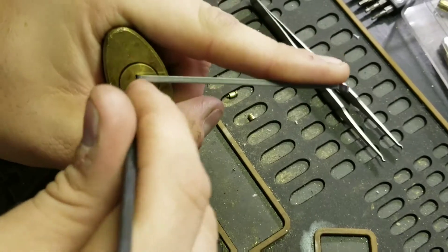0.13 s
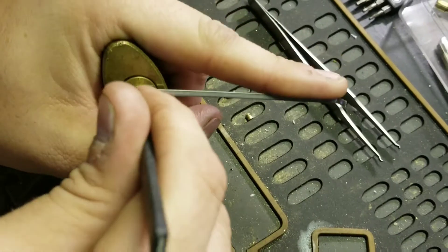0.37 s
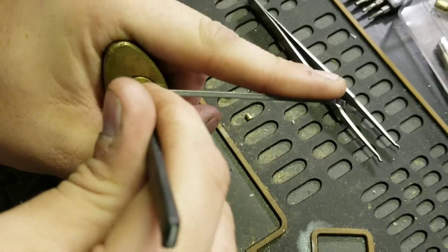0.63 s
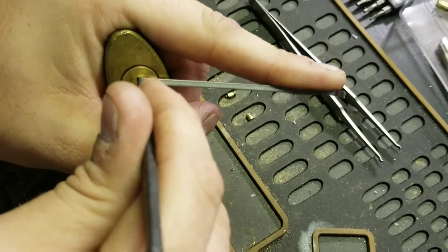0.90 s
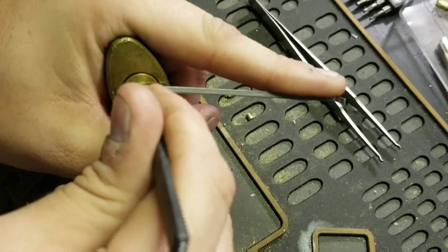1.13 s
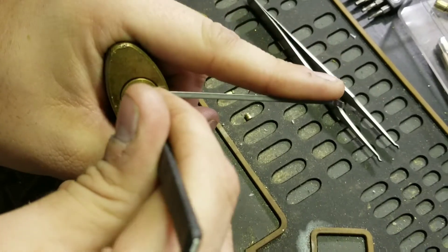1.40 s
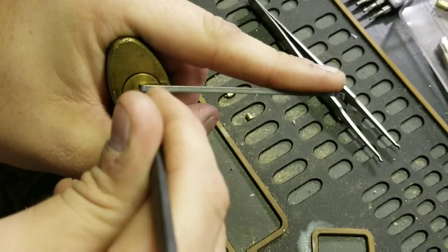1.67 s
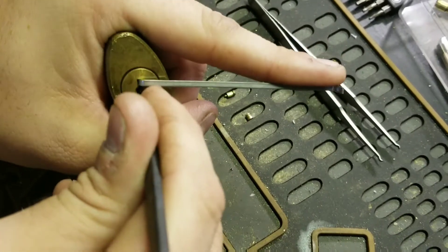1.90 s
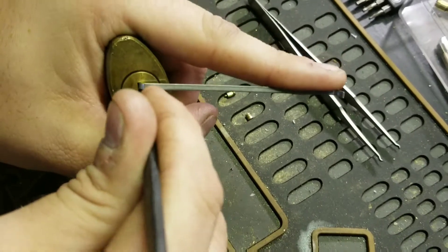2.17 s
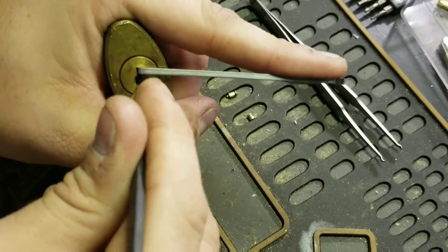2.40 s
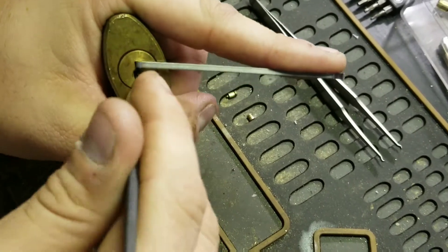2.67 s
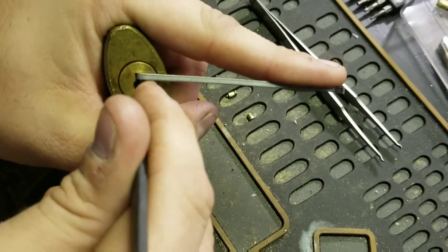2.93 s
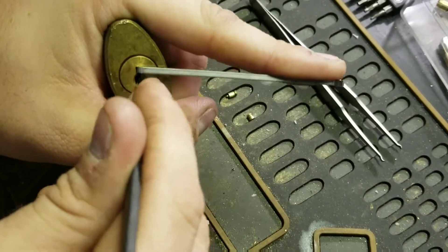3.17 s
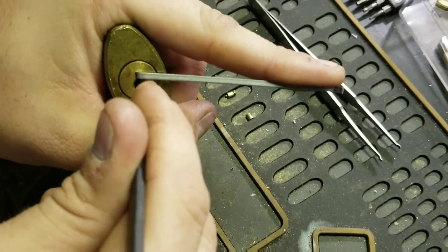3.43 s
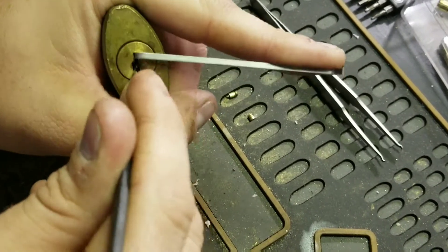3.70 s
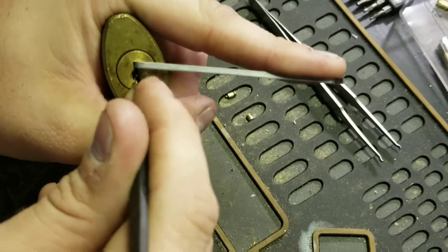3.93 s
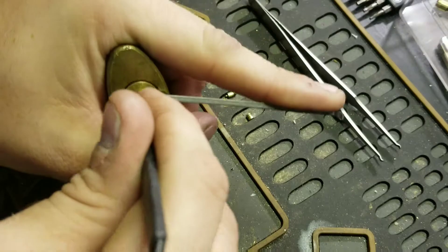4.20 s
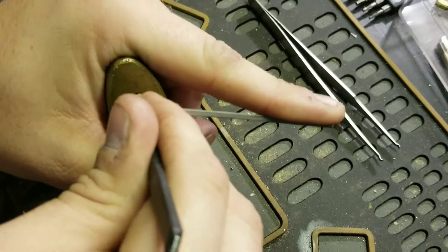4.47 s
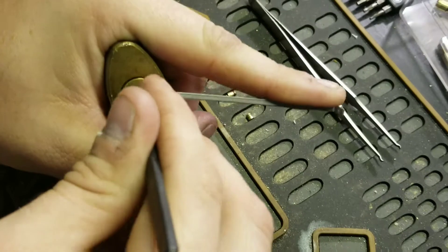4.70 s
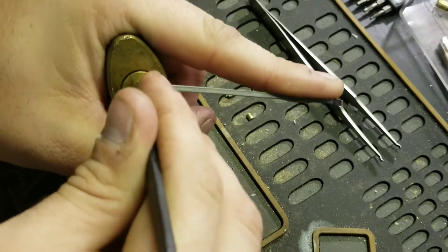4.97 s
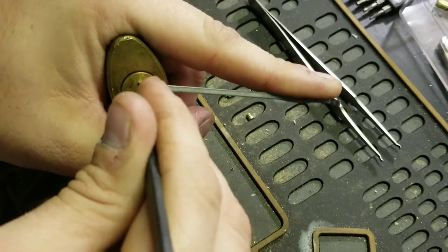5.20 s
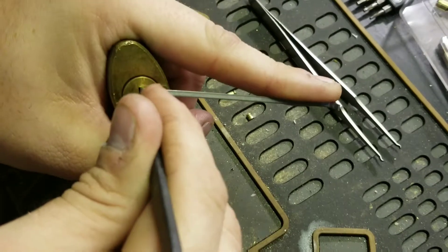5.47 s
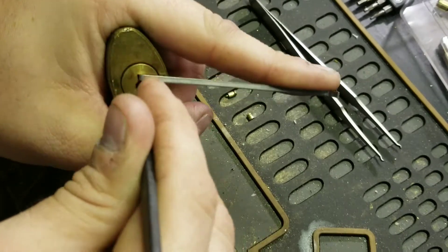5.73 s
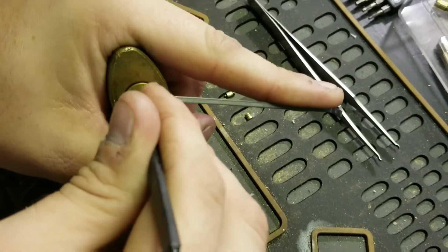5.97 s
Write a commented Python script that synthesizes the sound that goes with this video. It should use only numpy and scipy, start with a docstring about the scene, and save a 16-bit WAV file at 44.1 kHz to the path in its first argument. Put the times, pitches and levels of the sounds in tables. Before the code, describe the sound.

A low fan rumble with a steady motor hum and faint hiss runs throughout. Close by, left of centre, a thin steel pick works a brass padlock: silence at first, then a bright double snap near two seconds, smaller ticks, another firm snap before four, a crisp one before five, and a faint cluster of ticks at the end. Small room, close stereo microphones, a short faint tail.

```python
"""In a small room, a thin steel pick works the pins of a brass padlock close to two microphones.
A ventilation fan rumbles as noise shaped by the room's resonances, over a steady mains hum and hiss.
Pins snap now and then, left of centre: each snap is a filtered click, a little rattling noise,
and dying sine waves for the brass and the steel. Short knocks and pings are one damped sine each.
Early echoes and a tail of random taps put the lock in the room."""
import sys
import numpy as np
from scipy import signal
from scipy.fft import irfft, next_fast_len
from scipy.io import wavfile

SR = 44100
rng = np.random.default_rng(int(sys.argv[2]) if len(sys.argv) > 2 else 0)


def gain_from_decibels(decibels):
    """Convert decibel values to linear amplitude factors."""
    exponent = np.asarray(decibels, float) / 20
    return 10 ** exponent


def to_wav(s):
    """Save 16-bit WAV."""
    ch = np.atleast_2d(s).T  # columns
    pcm = np.round(np.clip(ch, -1, 1) * 32767)  # PCM
    wavfile.write(sys.argv[1], SR, pcm.astype(np.int16))


N = 269230  # length in samples

LAG = 3  # samples by which the right microphone hears the lock later
CONTACT_S = .00012  # the tool's ring and the pings take about this long to start swinging


def read(points, hz):
    """Reads a (pitch, value) table between its points, on a log-pitch axis."""
    table_hz, value = np.transpose(points)
    return np.interp(np.log(hz + 1), np.log(table_hz + 1), value)


# Colour of the fan noise and hiss: pitch_hz, level_db (per Hz, relative)
AIR_COLOUR = [(20, -34), (60, -26), (110, -16), (160, -17), (300, -28), (410, -37), (520, -29.5),
              (680, -35), (760, -39.5), (960, -38.5), (1010, -46), (1500, -52), (2200, -60), (4000, -65.5),
              (15550, -67.5), (15800, -110)]
# Where the room and duct resonances lift the fan noise: pitch_hz
RESONANCE_HZ = [40, 90, 116, 138, 176, 205, 242, 283, 356, 474, 547, 572, 656, 706, 845, 899, 922, 954,
                1364, 1515]
# Shape of each of those resonances: width_hz (where it is 6 dB down), height_db (over the noise)
RESONANCE_SHAPE = [(10, 8), (8.8, 10.5), (5.95, 10), (15.2, 11.5), (10.4, -2), (6.8, 11), (13.4, 5),
                   (11.8, 9), (10.4, 1.5), (13, 6), (8.2, 7), (9.9, 5.5), (19.8, 7.5), (4.7, -10),
                   (11.3, 9.5), (14.9, 8.5), (18.3, 2.5), (8.1, 2.5), (19, 8.5), (15, 8.5)]
# How alike the noise is at the two microphones: pitch_hz, likeness (1 same, 0 unrelated, below 0 opposed)
LIKENESS = [(60, 0.99), (92, 1.0), (140, 0.99), (210, 0.99), (330, 0.87), (500, 0.68), (770, 0.18),
            (1170, 0.0076), (1790, -0.029), (2740, -0.1), (4190, -0.045), (6410, -0.16), (9810, -0.13),
            (15000, 0.34)]
# How the noise leans to one side: pitch_hz, left_minus_right_db
NOISE_LEAN = [(60, 0.5), (99, 0.0), (160, 0.5), (270, 1.5), (450, 1), (740, -3.5), (1220, 4), (2010, -0.5),
              (3330, 0.5), (5500, 0.5), (9080, 0.0), (15000, 0.0)]


def fan():
    """Air noise is random at every pitch, lifted at resonances, and nearly alike at both ears in the bass."""
    level_db = -35.5  # average (rms) level
    size = next_fast_len(N)
    hz = np.fft.rfftfreq(size, 1 / SR)
    lift = np.ones(len(hz))  # in power
    for centre_hz, (width_hz, height_db) in zip(RESONANCE_HZ, RESONANCE_SHAPE):
        distance = 2 * (hz - centre_hz) / width_hz
        lift += gain_from_decibels(height_db) ** 2 / (1 + distance ** 2) ** 2

    a, b, c, d = rng.standard_normal((len(hz), 4)).T
    same = np.clip(read(LIKENESS, hz), -1, 1)
    left = a + 1j * b
    right = same * left + np.sqrt(1 - same ** 2) * (c + 1j * d)

    lean = gain_from_decibels(read(NOISE_LEAN, hz) / 2)
    colour = gain_from_decibels(read(AIR_COLOUR, hz)) * np.sqrt(lift)
    noise = irfft(np.array([left * lean, right / lean]) * colour, size)[:, :N]
    return gain_from_decibels(level_db) * noise / noise.std()


def hum():
    """The fan motor hums at twice the mains frequency: one steady sine wave."""
    pitch_hz, level_db = 120.4, -41  # level is rms, hence the square root of 2
    turns = pitch_hz * np.arange(N) / SR + rng.random()
    return np.sqrt(2) * gain_from_decibels(level_db) * np.sin(2 * np.pi * turns)


def peaked(x):
    """Scales a sound to a peak of 1."""
    return x / abs(x).max()


def ring(modes, t, luck):
    """Dying sine waves that one blow starts together, each swinging up or down first; peak near 1."""
    hz, db, t60 = np.transpose(modes)[:, :, None]
    first_way = np.sign(luck[:len(hz), None] - .5)
    size = gain_from_decibels(db - 60 * t / t60) * first_way
    waves = size * np.sin(2 * np.pi * hz * t)
    return waves.sum(0) / np.linalg.norm(size[:, 0])


# The hands turn and shade the lock: time_s, body_left_minus_right_db, treble_left_minus_right_db
LOCK_FACING = [(1.8, 4, 2), (2.1, 4, 6), (3.2, 5, 0), (3.7, 6.5, 0), (4.8, 7, 8), (5.92, 9, 4),
               (6.0, 12, 4), (6.07, 17, 13)]


def facing(s):
    """How much louder the lock is at the left microphone at time s, in dB: body and treble."""
    times, *columns = np.transpose(LOCK_FACING)
    return np.array([np.interp(s, times, column) for column in columns])


# Steel tool's overtones: multiple (of its ring pitch), level_db (relative), cycles (to fall 60 dB)
STEEL_OVERTONES = [(.86, -15, 25), (1, 2, 34), (1.09, -13, 45), (1.23, -13, 30), (1.79, -12, 42)]


def steel_ring(hz, t, luck):
    """The free length of pick or wrench rings; the fingers mute its high overtones."""
    mute_hz, mute_db_per_khz = 7500, 4
    modes = []
    for multiple, db, cycles in STEEL_OVERTONES:
        mode_hz = multiple * hz
        muted_db = mute_db_per_khz * max(mode_hz - max(hz, mute_hz), 0) / 1000
        modes.append((mode_hz, db - muted_db, cycles / mode_hz))
    return (1 - np.exp(-t / CONTACT_S)) * ring(modes, t, luck)


# Brass body and pins, damped by the fingers: pitch_hz, level_db (relative), t60_s (time to fall 60 dB)
BRASS_MODES = [(9000, -7, .008), (9700, -3, .012), (10300, -3, .01), (11700, -2, .006), (12700, 0, .006),
               (13400, 0, .005), (14300, -1, .004), (15200, 0, .005)]


def brass_ring(centre_hz, harder_db, t, luck):
    """A blow stirs the brass modes near its centre pitch; a harder blow reaches further."""
    reach_hz = 2600 * gain_from_decibels(0.12 * harder_db)  # modes this far away are 12 dB weaker
    stirred = []
    for hz, db, t60 in BRASS_MODES:
        stirred.append((hz, db - 12 * ((hz - centre_hz) / reach_hz) ** 2, t60))
    return ring(stirred, t, luck)


# Pin contacts, levels before the mix: start_s, treble_crack_db, brass_centre_hz, tool_ring_hz, tool_ring_db
PIN_CONTACTS = [(1.8065, -21, 10000, 3560, -38.5), (1.8068, -22, 12700, 5700, -36),
                (1.8092, -27, 9000, 5500, -43), (1.817, -44, 9500, 3900, -52),
                (1.822, -41, 9700, 6900, -56), (2.0935, -36.5, 14300, 7240, -47),
                (2.656, -53, 11000, 6500, -62), (2.8566, -52, 11000, 2480, -62),
                (3.2085, -38.5, 12000, 2830, -57), (3.2205, -53, 12700, 5100, -66),
                (3.6851, -30.5, 12500, 2930, -38.5), (3.6878, -28.5, 13600, 2680, -47),
                (3.6945, -47, 13500, 3200, -52), (3.7075, -46, 11500, 3000, -64),
                (3.884, -56, 11000, 7400, -52), (3.966, -52, 13500, 2600, -72),
                (4.147, -46, 13200, 2600, -72), (4.8032, -34, 14500, 5850, -41),
                (4.8035, -27.5, 14700, 7150, -33.5), (4.8068, -38, 14500, 8000, -43),
                (4.8085, -43, 12000, 4800, -51), (4.815, -52, 15000, 5500, -53),
                (5.92, -52, 11500, 5730, -49), (5.923, -55, 14000, 5600, -58),
                (5.978, -49, 10500, 7000, -60), (5.992, -58, 11500, 7700, -59),
                (6.0072, -66, 13500, 2880, -42), (6.0584, -58, 14500, 4400, -67),
                (6.0622, -51, 15300, 2850, -64), (6.0684, -57, 13800, 3300, -56),
                (6.0704, -62, 13800, 3400, -50), (6.0709, -64, 14000, 4450, -56),
                (6.0725, -60, 13800, 7500, -52), (6.0744, -53, 12000, 7000, -59),
                (6.0835, -50, 15000, 7950, -56), (6.093, -58, 12500, 8300, -63)]


def snaps():
    """Each contact is a short crack with a rattle, brass and steel ringing; also returns bare cracks."""
    soft_db = -31  # contacts below this scrape longer, those above it stir more brass
    middle_low_hz, middle_high_hz = 900, 8400
    t = np.arange(4096) / SR
    near, bare = np.zeros((2, 2, N + len(t)))
    lucks = rng.random((len(PIN_CONTACTS), 2, 16))
    noises = rng.standard_normal((len(PIN_CONTACTS), 2, len(t)))
    blow = signal.unit_impulse(len(t))
    rise = 1 - np.exp(-t / 0.000047)
    middle = signal.butter(2, [middle_low_hz, middle_high_hz], "band", fs=SR, output="sos")
    tock = peaked(signal.sosfilt(middle, blow))

    for n, (row, luck, noise) in enumerate(zip(PIN_CONTACTS, lucks, noises)):
        s, crack_db, brass_hz, tool_hz, tool_db = row
        at = round(s * SR)
        treble = signal.butter(3, 0.8 * brass_hz, "high", fs=SR, output="sos")
        tick = peaked(signal.sosfilt(treble, blow))
        steel = gain_from_decibels(tool_db) * steel_ring(tool_hz, t, luck[0])
        brass = rise * brass_ring(brass_hz, max(crack_db - soft_db, 0), t, luck[1])
        rattle_s = .0022 + .00004 * max(soft_db - crack_db, 0)
        # the middle lies between crack and ring in level, less 13.5 dB; higher brass has less of it
        middle_db = 0.65 * crack_db + 0.35 * tool_db - 13.5
        middle_db -= 1.5 * (brass_hz - 12500) / 1000

        # alternate contacts go into separate bare tracks
        first_swings = steel * np.exp(-t * tool_hz / 2.0)
        bare_crack = gain_from_decibels(crack_db) * (0.65 * tick + 0.12 * brass)
        bare_crack += 2.4 * gain_from_decibels(middle_db) * tock + 0.64 * first_swings
        bare[n % 2, at:at + len(t)] += bare_crack

        for ear in range(2):
            # the pin and its spring rattle for a few ms, unlike at the two microphones
            rattle = .16 * noise[ear] * rise * np.exp(-t / rattle_s)
            high = .45 * tick + signal.sosfilt(treble, rattle) + 0.55 * brass
            mid = .8 * tock + 2.5 * signal.sosfilt(middle, rattle)
            body_db, high_db = (1 - ear) * facing(s)
            sound = gain_from_decibels(body_db) * (steel + gain_from_decibels(middle_db) * mid)
            sound += gain_from_decibels(crack_db + high_db) * high
            start = at + LAG * ear
            near[ear, start:start + len(t)] += sound
    return near[:, :N], bare[:, :N]


# Short knocks and pings, mostly sounding with the pin contacts:
# start_s, pitch_hz, level_db (at the right, before it dies away), cycles (to fall 60 dB)
CONTACT_PINGS = [(1.8062, 850, -39, 9), (1.8066, 2600, -46, 30), (1.8062, 1300, -36, 30),
                 (2.0935, 2750, -51, 18), (2.857, 2730, -52, 34), (2.861, 2500, -55, 30),
                 (3.2085, 2600, -48, 9), (3.2085, 5800, -47, 16), (3.6845, 870, -30.5, 6),
                 (3.685, 2500, -41, 16), (3.6851, 5250, -40, 40), (3.6853, 7400, -44, 36),
                 (4.8035, 1850, -44, 7), (4.8036, 5850, -42, 55), (5.92, 1700, -49, 7),
                 (6.0074, 4850, -48, 30), (6.0835, 8300, -52, 22)]


def knocks():
    """Short knocks and pings, one damped sine each, mostly sounding with the pin contacts."""
    t = np.arange(2048) / SR
    out = np.zeros((2, N + 4096))
    for s, hz, db, cycles in CONTACT_PINGS:
        fading = gain_from_decibels(db - 60 * t * hz / cycles) * (1 - np.exp(-t / CONTACT_S))
        ping = fading * np.sin(2 * np.pi * hz * t)
        for ear in range(2):
            start = round(s * SR) + LAG * ear
            out[ear, start:start + len(t)] += gain_from_decibels(facing(s)[0] * (1 - ear)) * ping
    return out[:, :N]


# Echoes off the bench and hands: delay_s, left_db, right_db
EARLY_ECHOES = [(.0009, -10, -21.5), (.0023, -43, -24), (.0034, -21, -19), (.0051, -19, -23),
                (.0078, -16, -21)]


def bounces(x):
    """Single early echoes of the lock, other strengths at each microphone, every second one flipped."""
    taps = np.zeros((2, 1024))
    for k, (delay_s, *db) in enumerate(EARLY_ECHOES):
        taps[:, round(delay_s * SR)] = (-1) ** k * gain_from_decibels(db)
    return signal.oaconvolve(x.mean(0, keepdims=True), taps, axes=1)[:, :N]


# How long the room's tail lasts: pitch_hz, t60_s (time to fall 60 dB)
TAIL_T60 = [(1000, 0.51), (3000, 0.25), (7000, 0.28), (11000, 0.26), (15000, .18)]


def room(x):
    """Sparse echoes of random sign, one in every 20 samples, each band dying at its own speed."""
    wet_db = 1.2  # tail over the sound sent in
    slots = np.arange(120, SR // 2, 20)
    places = slots + rng.integers(0, 20, (2, len(slots)))
    signs = rng.choice([-1., 1.], (2, len(slots)))
    taps = np.zeros((2, SR // 2 + 20))
    np.put_along_axis(taps, places, signs, 1)

    hz, t, bands = signal.stft(taps, SR, nperseg=256)
    dying = gain_from_decibels(-60 * t / read(TAIL_T60, hz)[:, None])
    tail = signal.istft(bands * dying, SR, nperseg=256)[1]
    tail = tail / np.linalg.norm(tail[0])
    return gain_from_decibels(wet_db) * signal.fftconvolve(x[None], tail, axes=1)[:, :N]


def scene():
    """Fan, hum, lock and echoes; the room sums all directions, so it gets the smoother bare cracks."""
    air = fan() + hum()
    lock, bare = snaps()
    knocks_and_pings = knocks()
    lock = lock + knocks_and_pings
    # alternate contacts get separate random tails, so close cracks blend smoothly
    tails = room(bare[0] + 0.32 * knocks_and_pings[1]) + room(bare[1])
    lock = lock + bounces(lock) + tails
    microphone_band = signal.cheby1(6, 1, 15400, fs=SR, output="sos")  # top of the band, Hz
    return signal.sosfilt(microphone_band, lock) + air


def roll_off(x):
    """The treble ends steeply here."""
    return signal.sosfilt(signal.butter(12, 16510, fs=SR, output="sos"), x)


def record(dry):
    """Fades the mix in over the first 5 ms and finishes it."""
    fade = np.minimum(np.arange(N) / (.005 * SR), 1)
    return roll_off(dry * fade)


dry = scene()
out = record(dry)
to_wav(out)
```